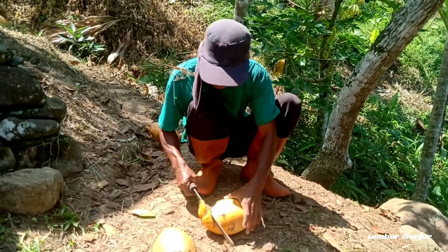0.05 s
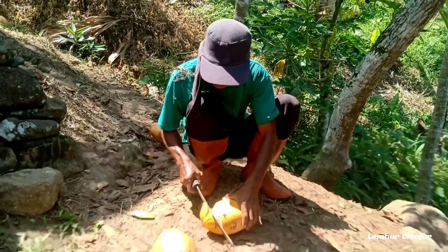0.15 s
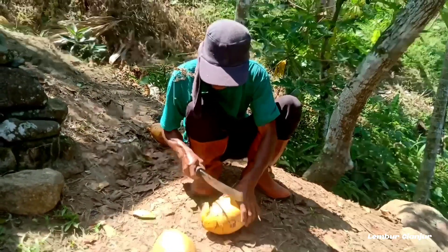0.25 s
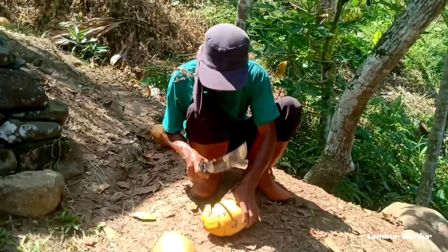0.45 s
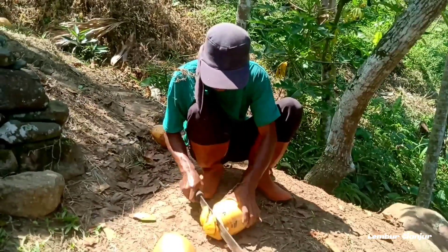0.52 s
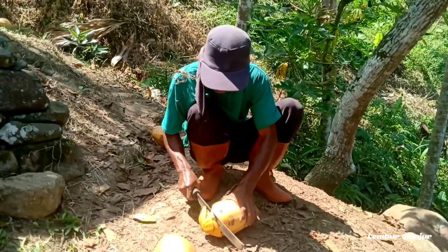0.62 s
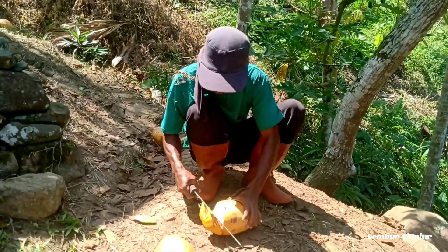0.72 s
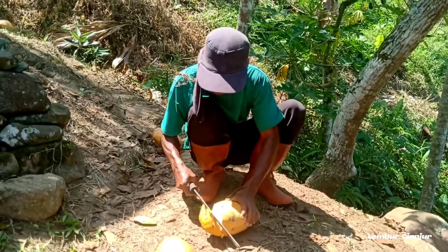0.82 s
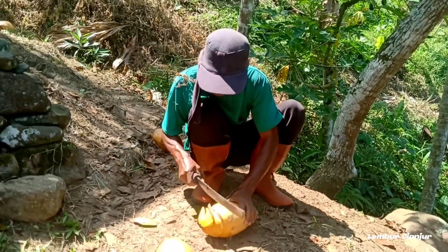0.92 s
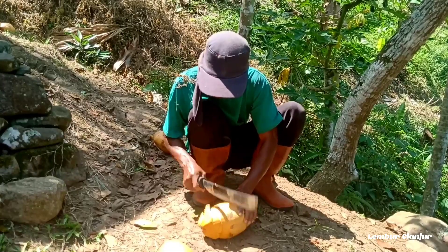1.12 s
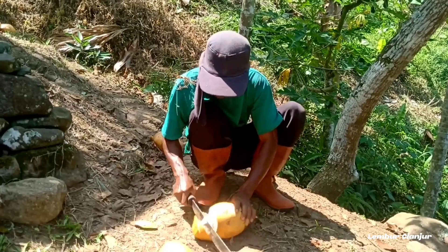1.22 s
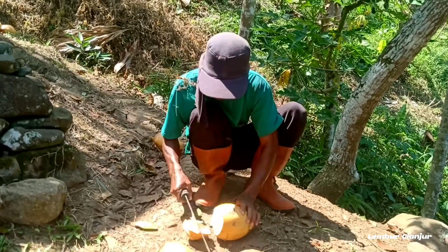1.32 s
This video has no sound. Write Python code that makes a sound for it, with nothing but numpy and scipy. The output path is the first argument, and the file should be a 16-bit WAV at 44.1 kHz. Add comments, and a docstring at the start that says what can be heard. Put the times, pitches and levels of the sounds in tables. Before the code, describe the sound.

Machete blows on a coconut in the open air: a soft scrape, one hard hollow knock that overloads the microphone, and a quick lighter one. Two brief tearing slices follow, the first ending in a light knock, over faint hiss.

```python
"""A machete works on a young coconut on bare ground, outdoors.
The blade rubs in the husk, then knocks the hollow nut twice, the first blow hard enough to overload
the left microphone. Each knock rings nut and blade and drives the nut into the soil.
Two slices tear through wet fibres, the first ending in a lighter knock.
Faint echoes and a steady hiss lie underneath."""
import sys
import numpy as np
from scipy import signal
from scipy.fft import rfft, irfft
from scipy.io import wavfile
from scipy.ndimage import uniform_filter1d

SR = 44100
rng = np.random.default_rng(int(sys.argv[2]) if len(sys.argv) > 2 else 0)


def put_to_file(sound):
    """Save the sound as 16-bit audio at rate SR, in the file named by the first command-line argument."""
    columns = np.atleast_2d(sound).T  # one column per channel
    safe = np.clip(columns, -1, 1)
    whole_steps = np.round(safe * 32767)
    wavfile.write(sys.argv[1], SR, whole_steps.astype(np.int16))


N = 59535

# blade drag in the cut (time [s], level [dB])
RUB_LEVELS = [(0, -3.5), (.06, -12.5), (.115, 0.5), (.17, -3), (.22, -10), (.24, -43)]
# blows on the nut (time [s], nut level [dB], contact [s], pitch [ratio], nut tilt [dB/oct], blade [dB],
# clack [dB], crack [dB], crack tilt [dB/oct], thud [dB], thud pitch [Hz], thud delay [s], thud t60 [s])
KNOCK_EVENTS = [(0.0623, -31, 0.0035, 1.04, 0.5, -48, -58, -79, -1.5, -39.5, 85.6, 0.0049, 0.054),
                (0.1045, -36.5, 0.0042, 0.97, 7.5, -71, -82, -60.5, -3.5, -47, 86.5, 0.0032, .1),
                (0.2322, 3, 0.0029, 1.02, 0, -33.5, -29.5, -19.5, -1, -14.5, 96, 0.0037, 0.19),
                (0.3244, -4.5, 0.0035, 1.017, -1.5, -41.5, -33, -73, -4, -22, 103, 0.0037, 0.093),
                (0.6469, -18.5, 0.0079, 1.04, 5, -54, -17.5, -25, -1, -18.5, 118.3, 0.01337, 0.041)]
# spurts of tearing (time [s], hold [s], level [dB], tilt [dB/oct], t60 [s], snap [dB], nut ring [dB])
SLICE_SPURTS = [(0.6000, 0.0026, -26.5, -0.26, 0.057, -15, -45),
                (0.605, 0.0022, -24.5, 0.45, 0.062, -45, -44),
                (0.6182, 0.002, -26.5, -0.5, 0.037, -28, -42), (0.635, 0.0097, -44.5, 2.5, 0.12, -52, -58),
                (1.2572, 0.013, -30.5, -0.5, 0.023, -35, -33.5),
                (1.2732, 0.005, -32.5, -0.24, 0.063, -32.5, -50), (1.2945, 0.0017, -43, 3, 0.13, -60, -60)]

# modes (frequency [Hz], t60 [s], left [dB], right [dB])
NUT_MODES = [(300, 0.0475, -33.5, -19), (461.8, 0.037, -9, -15), (519, 0.04, -21, -21),
             (868.5, 0.018, 1, -32), (964.7, 0.032, -12.5, -21.5), (1101, 0.0067, -21.5, -21.5),
             (1346, .016, -12.5, -19), (1849, 0.0056, -18, -26), (2560, 0.0058, -27.5, -50)]
BLADE_MODES = [(884, .2, -20, -2.5), (1080, 0.51, -1.5, -15), (1119, 0.2, 1, -11), (1500, 0.13, -13, -5.5),
               (2260, 0.35, -7.5, -19), (2405, 0.89, -24, -15.5), (2815, 0.14, -34, -28.5)]
CLACK_MODES = [(1600, 0.012, -19, 0), (2276, .025, 3, -11), (2696, 0.013, -2.5, -10)]  # edge on shell
SNAP_MODES = [(2605, 0.033, -13, 1.5), (2807, 0.0367, -4.5, -14), (3030, 0.047, -6.5, -12)]  # husk splitting

# spectra (frequency [Hz], density [dB])
GROUND_SPECTRUM = [(30, -34.5), (60, 2), (85, 9), (170, -1.5), (250, -10), (600, -30), (2000, -79)]
AIR_SPECTRUM = [(25, 1), (50, -4.5), (110, -4), (180, -6), (260, -9), (370, 0), (550, -5.5), (780, -7),
                (1050, -11), (1550, -14.5), (2000, -8), (2700, -11), (3100, -22), (4100, -27.5),
                (7000, -33), (15500, -35.5)]
HUSK_SPECTRUM = [(60, -11), (250, -11.5), (450, -2), (900, -1.5), (1400, -1.5), (2000, 2), (2800, -4),
                 (3700, -14), (6000, -17), (9000, -25.5), (15000, -24.5)]
ECHO_SPECTRUM = [(40, -1.5), (110, 8), (250, -0.5), (500, -35.5), (1000, -10), (2500, -9.5), (5000, -4.5),
                 (15000, -19)]

RING_RISE_S, SNAP_RISE_S, RIGHT_LAG_S = 0.0003, 0.00043, 0.00027
GROUND_PAN_DB, HUSK_PAN_DB = -17.5, 1.5


def undb(db):
    return 10 ** (np.asarray(db) / 20)


def unit_rms(x):
    return x / np.sqrt(np.mean(x ** 2))


def pan(db):
    """Stereo gains for a left-minus-right level."""
    return undb(np.array([[db], [-db]]) / 2 - abs(db) / 2)


def since(start_s):
    """Seconds since the start, zero before it."""
    return np.maximum(np.arange(N) / SR - start_s, 0)


def envelope(start_s, rise_s, hold_s, t60_s):
    """Attack, hold, exponential release."""
    attack = 1 - np.exp(-since(start_s) / rise_s)
    return attack * np.exp(-np.log(1000) * since(start_s + hold_s) / t60_s)


def colour(x, spectrum, tilt_db_oct=0, size=4096):
    """Minimum-phase filter of unit power through a tilted spectrum."""
    octave = np.log2(np.maximum(np.fft.rfftfreq(size, 1 / SR), 1))
    hz, db = np.array(spectrum).T
    tilt_db = tilt_db_oct * np.clip(octave, np.log2(hz[0]), np.log2(hz[-1]))
    gain = unit_rms(undb(np.interp(octave, np.log2(hz), db) + tilt_db))
    cepstrum = irfft(np.log(gain))
    cepstrum[1:size // 2] *= 2
    cepstrum[size // 2 + 1:] = 0
    impulse = irfft(np.exp(rfft(cepstrum)))
    return signal.fftconvolve(np.atleast_2d(x), impulse[None], axes=1)[:, :N]


def spread(mid, side, width):
    """Two partly correlated channels."""
    return (mid + width * side * np.array([[1], [-1]])) / np.hypot(1, width)


def wander(rate_hz):
    """Slow random drift, unit RMS."""
    step = int(SR / rate_hz)
    stairs = np.repeat(rng.standard_normal(N // step + 2), step)
    return unit_rms(uniform_filter1d(stairs, step)[:N])


def ring(modes, start_s, rise_s, hold_s=0, pitch_ratio=1, tilt_db_oct=0):
    """Struck modes swell, hold and decay; the right channel lags."""
    out = np.zeros((2, N))
    centre_hz = np.median([mode[0] for mode in modes])
    span = slice(int(start_s * SR), int(start_s * SR) + SR // 2)
    t = np.array([since(start_s)[span], since(start_s + RIGHT_LAG_S)[span]])
    swell = 1 - np.exp(-(t / rise_s) ** 2)
    fall = -np.log(1000) * np.maximum(t - hold_s, 0)
    for hz, t60_s, left_db, right_db in modes:
        gain = undb(np.array([[left_db], [right_db]]) + tilt_db_oct * np.log2(hz / centre_hz))
        out[:, span] += gain * swell * np.exp(fall / t60_s) * np.sin(2 * np.pi * hz * pitch_ratio * t)
    return out


def rubbing(nut_db=-51, ground_db=-45):
    """The blade drags unevenly in the cut; the nut hums and shifts on the ground."""
    force = undb(np.interp(since(0), *np.array(RUB_LEVELS).T) + 2 * wander(rate_hz=59))
    friction = rng.standard_normal((1, N))
    nut = unit_rms(signal.fftconvolve(friction, ring(NUT_MODES, 0, RING_RISE_S))[:, :N])
    ground = colour(rng.standard_normal(N), GROUND_SPECTRUM) * pan(GROUND_PAN_DB)
    return force * (undb(nut_db) * nut + undb(ground_db) * ground)


def air(left_db=-52, right_db=-53.5, waver_db=0.7):
    """Steady outdoor hiss, wavering slightly."""
    hiss = colour(spread(*rng.standard_normal((2, N)), width=0.95), AIR_SPECTRUM)
    return hiss * undb(np.array([[left_db], [right_db]]) - waver_db * wander(rate_hz=14))


def knocks():
    """Each blow rings nut and blade, clacks on the shell, cracks the husk and thuds into the ground."""
    out = np.zeros((2, N))
    for (at_s, nut_db, contact_s, pitch_ratio, nut_db_oct, blade_db, clack_db, crack_db, crack_db_oct,
         thud_db, thud_hz, thud_delay_s, thud_t60_s) in KNOCK_EVENTS:
        swell_s = 0.36 * contact_s
        out += undb(nut_db) * ring(NUT_MODES, at_s, swell_s, contact_s, pitch_ratio, nut_db_oct)
        out += undb(blade_db) * ring(BLADE_MODES, at_s, RING_RISE_S)
        out += undb(clack_db) * ring(CLACK_MODES, at_s, SNAP_RISE_S)
        out += undb(crack_db) * fibres(envelope(at_s, rise_s=1 / SR, hold_s=0, t60_s=0.02), crack_db_oct)
        out += undb(thud_db) * thud(at_s + thud_delay_s, thud_hz, thud_t60_s)
    return out


def fibres(force, tilt_db_oct, snaps_per_s=3200, scatter_db=3.5, shelf_hz=3420, shelf_db=-8.5):
    """Dense, uneven fibre snaps, coloured by the husk; less treble on the right."""
    snaps = (rng.random((2, N)) < snaps_per_s / SR) * rng.choice([-1, 1], (2, N))
    sizes = undb(scatter_db * rng.standard_normal((2, N)))
    crackle = spread(*unit_rms(snaps * sizes), width=0.45)
    left, right = colour(crackle * force, HUSK_SPECTRUM, tilt_db_oct)
    treble = signal.sosfiltfilt(signal.butter(2, shelf_hz, "high", fs=SR, output="sos"), right)
    return np.array([left, right + (undb(shelf_db) - 1) * treble]) * pan(HUSK_PAN_DB)


def thud(start_s, hz, t60_s, rise_s=0.0024, sag_s=0.0047, soil_t60_s=0.078, soil_db=-9.5):
    """The nut drives into the ground: a boom sagging an octave to hz, and a dull crunch of soil."""
    t = since(start_s)
    cycles = hz * (t + sag_s * (1 - np.exp(-t / sag_s)))
    boom = envelope(start_s, rise_s, 0, t60_s) * np.sin(2 * np.pi * cycles)
    crunch = rng.standard_normal((2, N)) * envelope(start_s, rise_s, 0, soil_t60_s)
    return (boom + undb(soil_db) * colour(crunch, GROUND_SPECTRUM)) * pan(GROUND_PAN_DB)


def slices(rise_s=0.0005):
    """The husk snaps open and the edge tears through in spurts, faintly ringing the nut."""
    out = np.zeros((2, N))
    for at_s, hold_s, tear_db, tilt_db_oct, t60_s, snap_db, nut_db in SLICE_SPURTS:
        out += undb(tear_db) * fibres(envelope(at_s, rise_s, hold_s, t60_s), tilt_db_oct)
        out += undb(snap_db) * ring(SNAP_MODES, at_s, SNAP_RISE_S)
        out += undb(nut_db) * ring(NUT_MODES, at_s, RING_RISE_S, hold_s)
    return out


def echoes(x, level_db=-27):
    """Bank, wall and trees scatter a faint, short tail."""
    scatter = rng.standard_normal((2, N)) * envelope(0, rise_s=0.0057, hold_s=0, t60_s=0.54)
    tail = unit_rms(colour(scatter, ECHO_SPECTRUM)) / np.sqrt(N)
    return undb(level_db) * signal.fftconvolve(x, tail, axes=1)[:, :N]


def scene():
    """Machete work in the open air."""
    work = knocks() + slices() + rubbing()
    return work + echoes(work) + air()


def record(dry, low_cut_hz=60, clip_level=0.96, top_hz=15600):
    """The recorder thins the deep bass, clips the hardest knock and cuts the top."""
    thinned = signal.sosfilt(signal.butter(2, low_cut_hz, "high", fs=SR, output="sos"), dry)
    clipped = np.clip(thinned, -clip_level, clip_level)
    return signal.sosfilt(signal.ellip(8, 0.2, 70, top_hz, fs=SR, output="sos"), clipped)


dry = scene()
out = record(dry)
put_to_file(out)
```